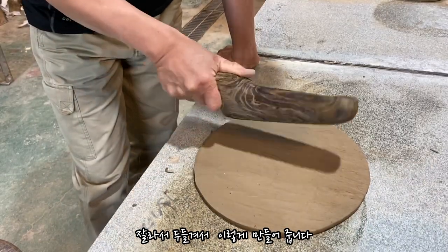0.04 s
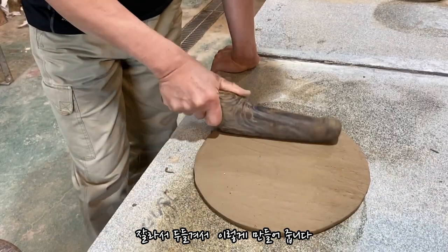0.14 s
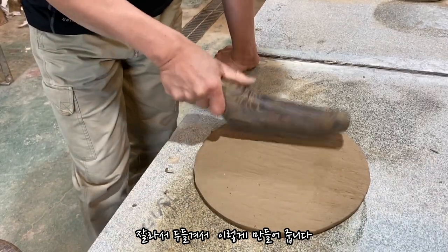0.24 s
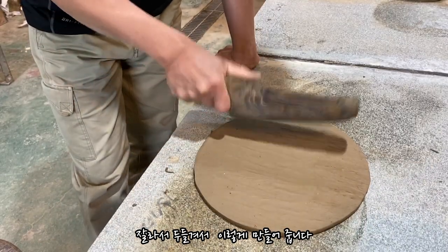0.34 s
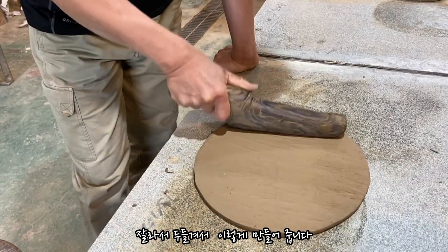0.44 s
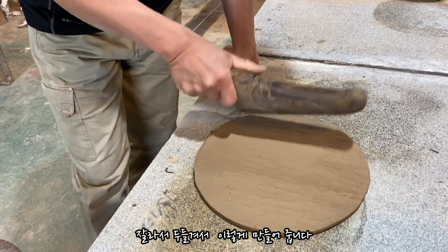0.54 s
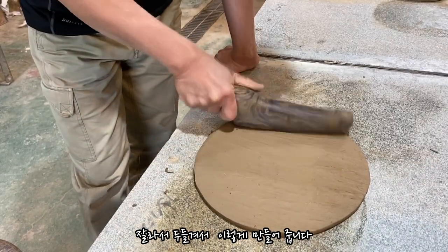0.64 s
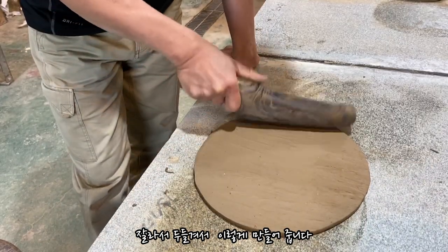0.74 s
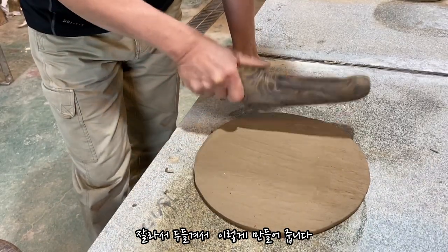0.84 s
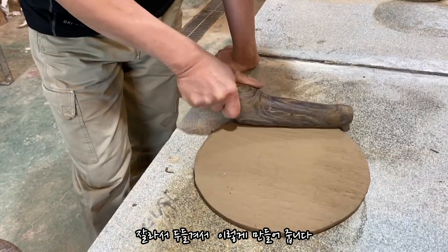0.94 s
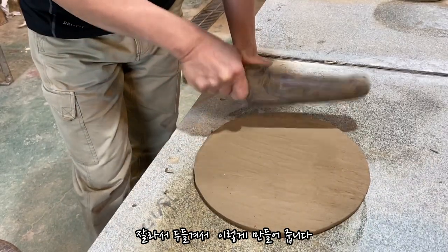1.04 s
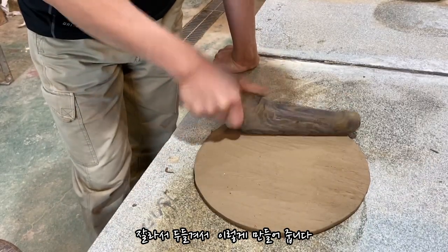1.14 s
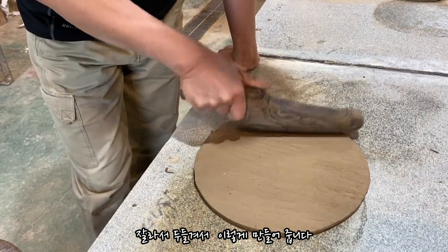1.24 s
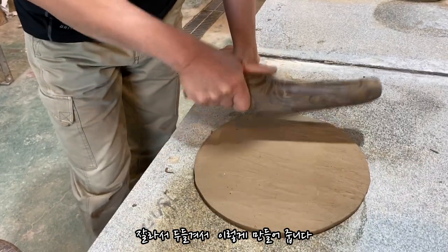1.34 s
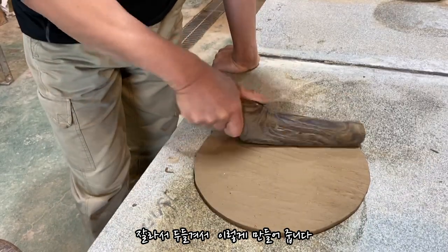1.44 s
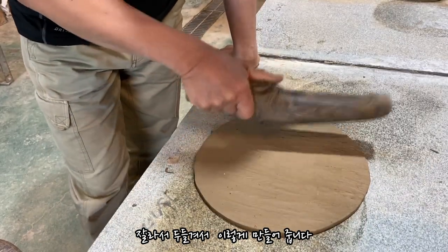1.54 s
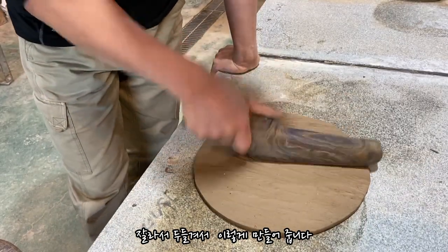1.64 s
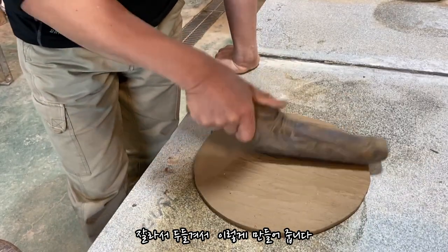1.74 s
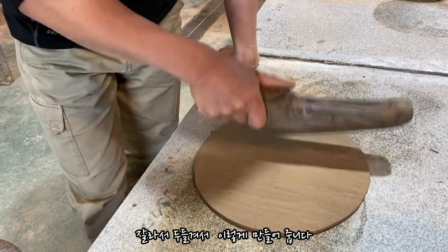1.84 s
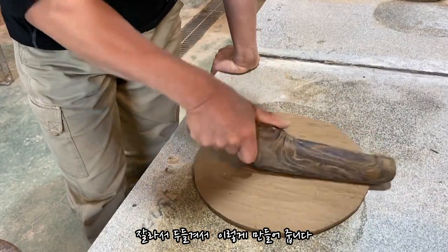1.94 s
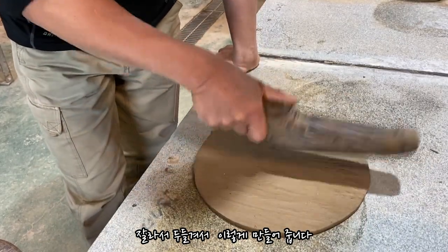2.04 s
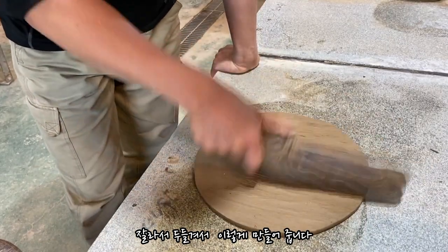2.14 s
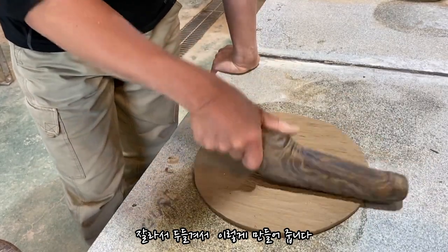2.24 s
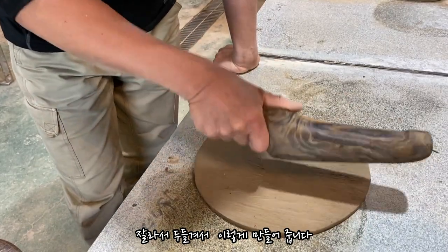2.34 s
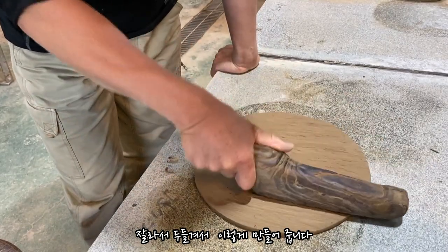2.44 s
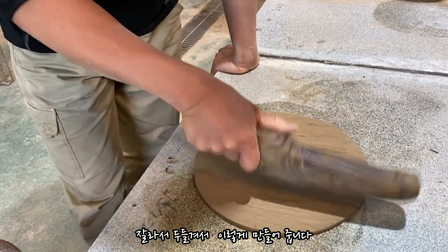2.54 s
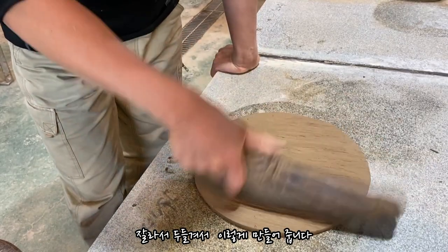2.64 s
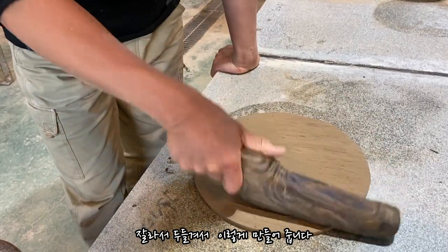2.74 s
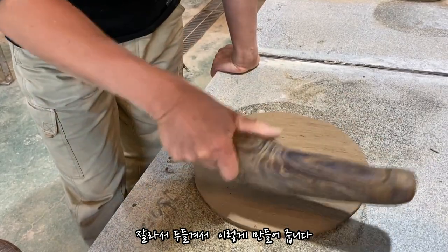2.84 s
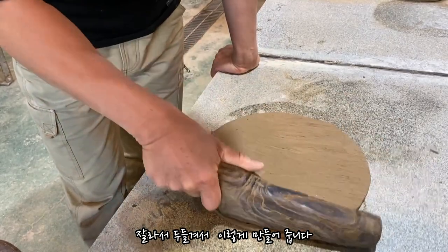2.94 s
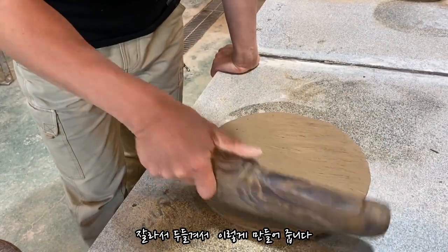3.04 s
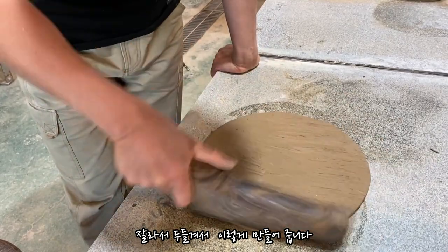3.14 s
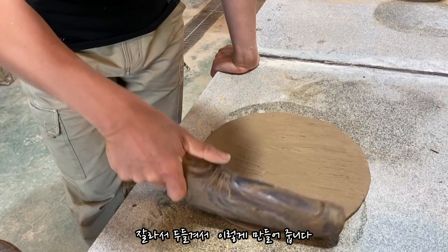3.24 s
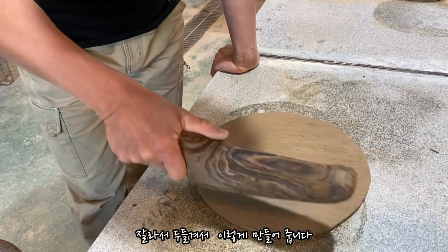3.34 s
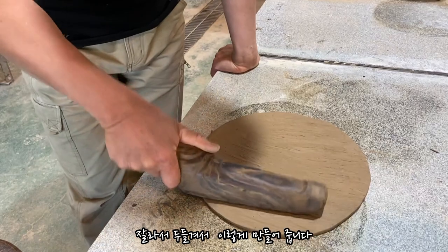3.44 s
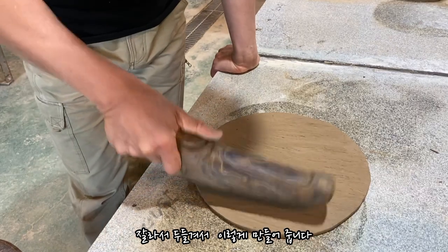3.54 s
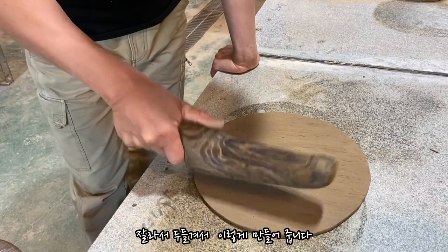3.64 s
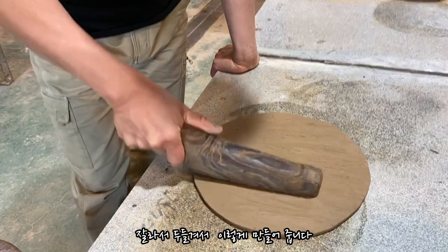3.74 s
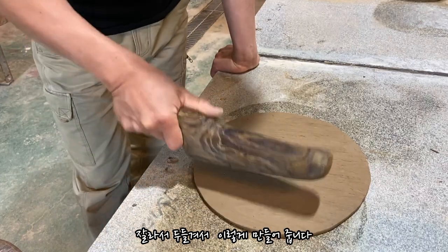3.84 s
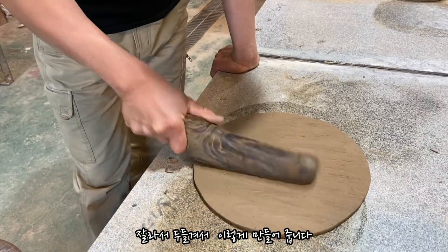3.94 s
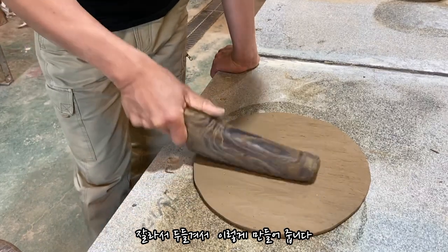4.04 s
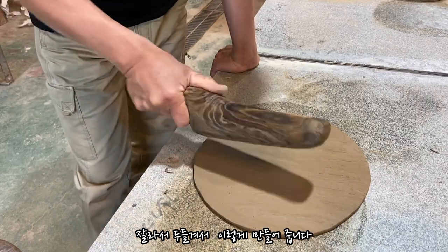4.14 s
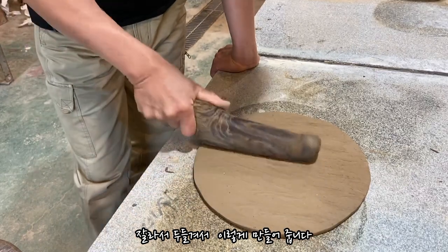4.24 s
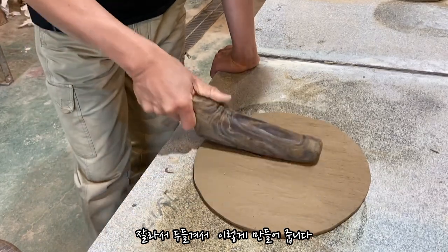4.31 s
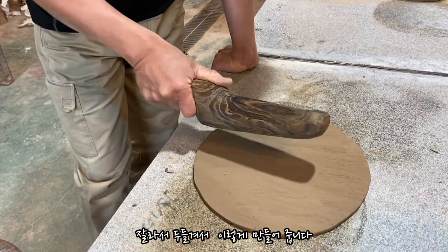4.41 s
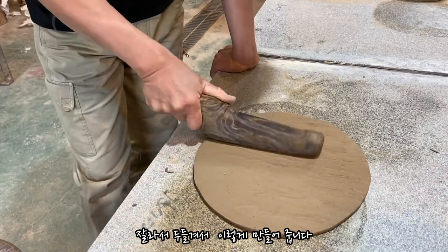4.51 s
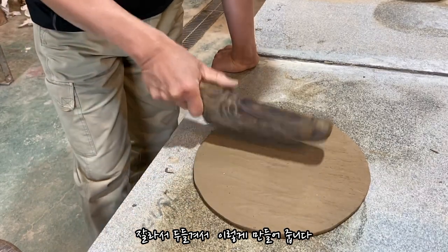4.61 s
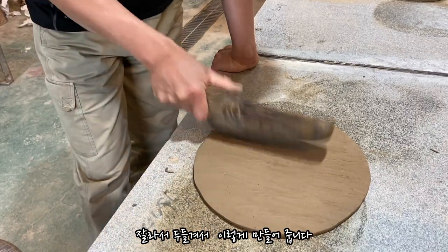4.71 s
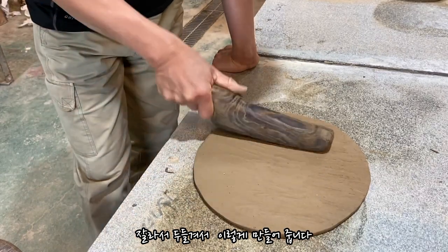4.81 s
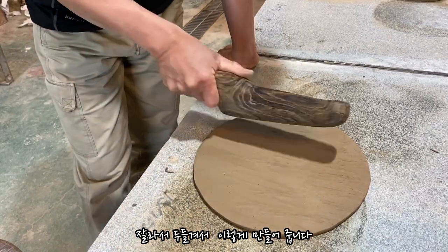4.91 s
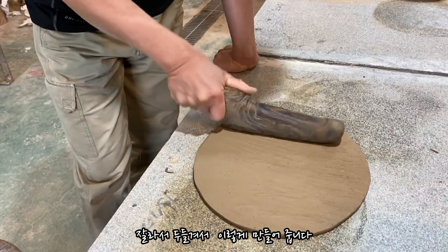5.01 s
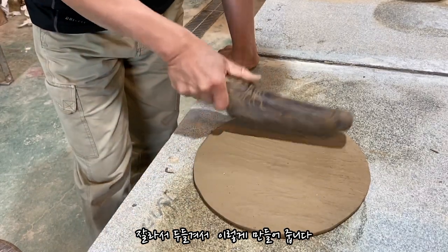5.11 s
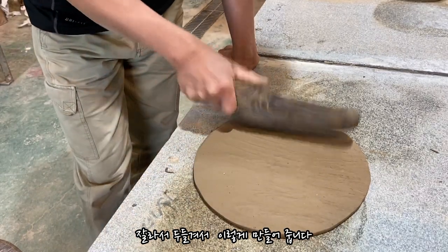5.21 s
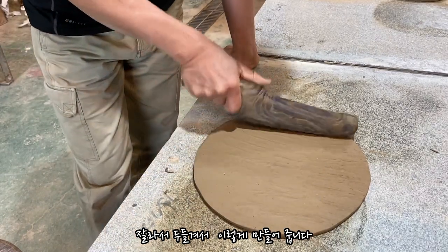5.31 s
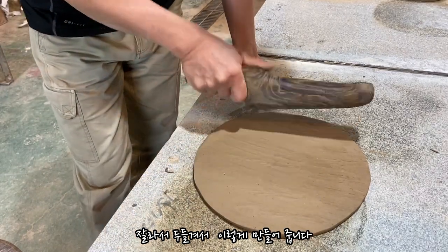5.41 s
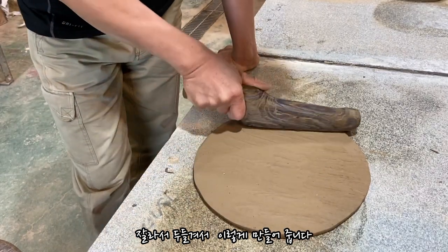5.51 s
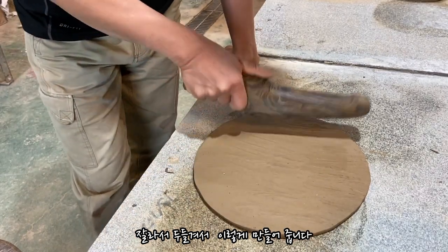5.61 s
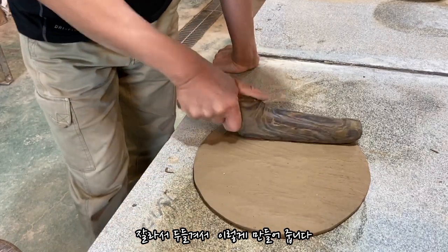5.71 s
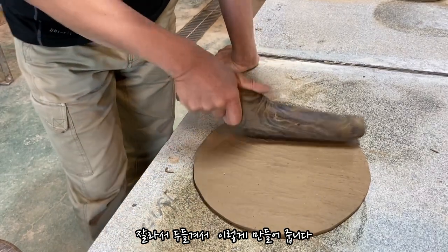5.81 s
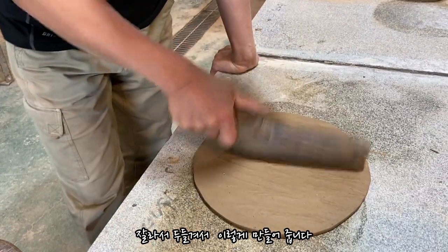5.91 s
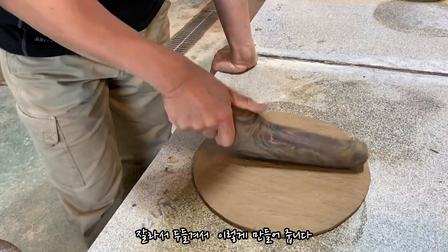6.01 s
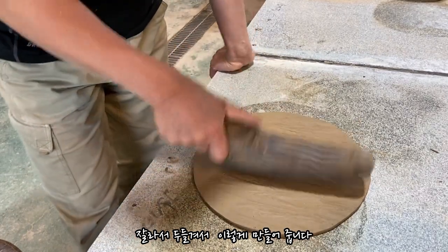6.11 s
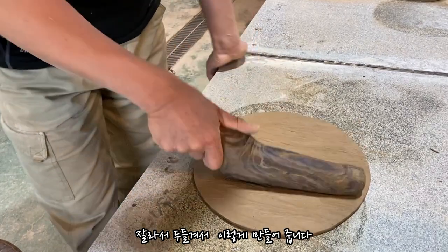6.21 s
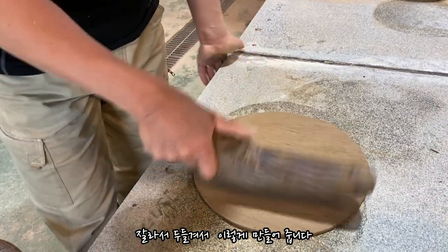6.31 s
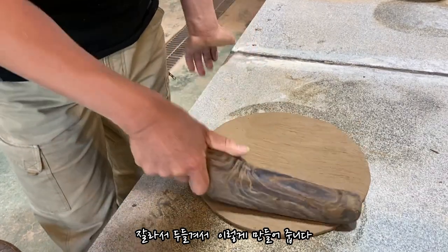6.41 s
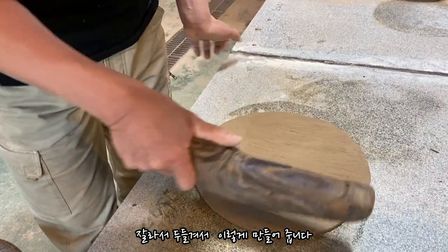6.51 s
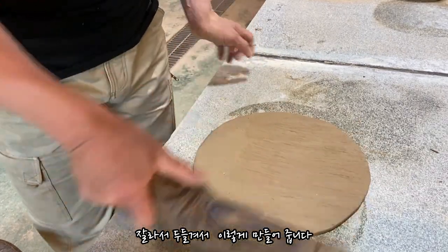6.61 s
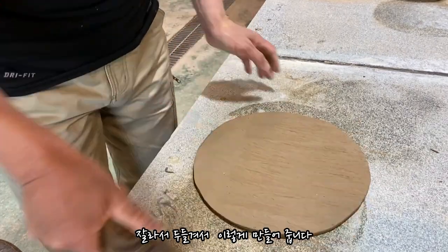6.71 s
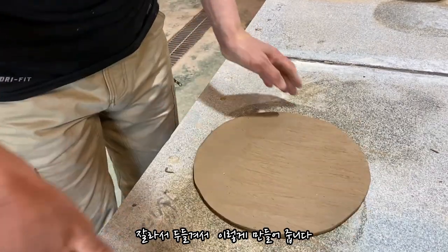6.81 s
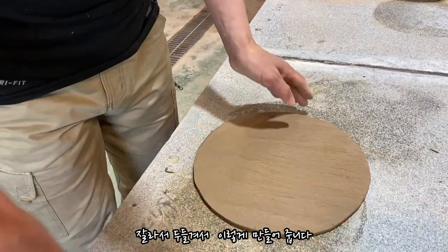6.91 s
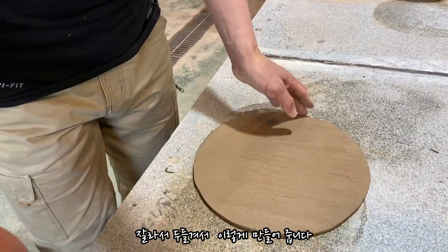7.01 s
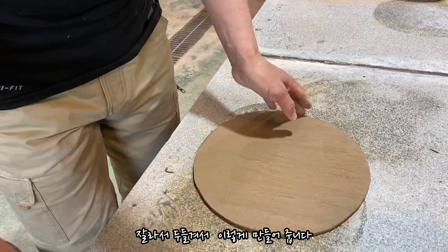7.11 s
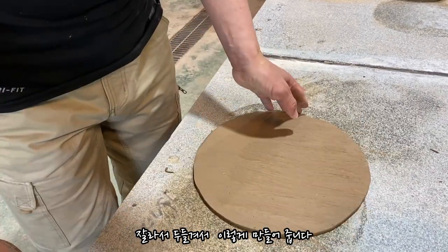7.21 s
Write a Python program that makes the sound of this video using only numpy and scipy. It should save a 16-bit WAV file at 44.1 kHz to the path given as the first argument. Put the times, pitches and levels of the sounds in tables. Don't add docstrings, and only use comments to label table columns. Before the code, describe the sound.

In a hard-walled pottery workshop, flat wood smacks moist clay in an even, quick rhythm for over six seconds. The slaps are bright and punchy, slightly different each time, with boomy table and room resonance underneath. After the final weaker hits the room decays to near silence, with faint wood-on-stone bumps, cloth rustle and tiny gritty ticks. Close microphone, loud peaks gently limited.

```python
import sys
import numpy as np
from scipy import signal
from scipy.io import wavfile
from scipy.ndimage import uniform_filter1d

SR = 44100
rng = np.random.default_rng(int(sys.argv[2]) if len(sys.argv) > 2 else 0)


def volts_from_db(level):
    exponent = np.asarray(level, float) / 20
    return 10 ** exponent


def persist_wave(psi):
    counts = np.round(np.clip(psi, -1, 1) * 32767).astype(np.int16)
    wavfile.write(sys.argv[1], SR, np.atleast_2d(counts).T)


N = 319901
LEAD_S = 1
LEAD_IN = 256
CONTACT_LEN = SR // 8


def read(points, hz):
    f, value = np.transpose(points)
    return np.interp(np.log(hz + 1), np.log(f + 1), value)


def colour(x, points):
    hz = abs(np.fft.fftfreq(4096, 1 / SR))
    log_gain = np.log(volts_from_db(read(points, hz)))
    phase = -signal.hilbert(log_gain).imag
    taps = np.fft.ifft(np.exp(log_gain + 1j * phase)).real[:2048]
    taps = taps.reshape((1,) * (x.ndim - 1) + (-1,))
    return signal.oaconvolve(x, taps, axes=-1)[..., :x.shape[-1]]


# (frequency [Hz], side against mid [dB])
WIDTH = [(60, -10.5), (130, -5.5), (290, -8), (640, 0), (1410, -1.5), (3100, -2), (6820, -4.5), (15000, -7)]


def spread(mid, other):
    side = colour(other, WIDTH)
    return np.array([mid + side, mid - side])


# (time [s], slap [dB], boom, thud, ring [dB against the slap])
EARLIER_BLOW = (-0.41, 14.5, -33, -38.5, -7)
# (time [s], slap [dB], weight of the arm [dB], paddle ring [dB])
BLOWS = [(0.075, -2, -30, -9.5), (0.3339, -1, -27.5, -6), (0.6011, -3.5, -28.5, -7),
         (0.8526, -3.5, -26.5, -11.5), (1.1035, -3, -27.5, -11.5), (1.354, -2.5, -28, -15),
         (1.6042, -3.5, -29.5, -10.5), (1.8578, -5, -28.5, -14), (2.1137, -1, -27, -12),
         (2.3688, -2, -25, -12.5), (2.616, -2, -25, -11.5), (2.8621, -1.5, -26, -13), (3.1134, -6, -27, -8),
         (3.3756, -2, -27.5, -17), (3.6428, -1.5, -22.5, -13), (3.909, -1, -27, -15),
         (4.1777, 0, -25, -12.5), (4.439, -2, -27, -8), (4.6941, -3, -24.5, -7.5),
         (4.9464, -3, -29.5, -17.5), (5.1942, -2, -26, -11.5), (5.435, -3, -28, -18),
         (5.67, -2.5, -26, -16), (5.889, -6.5, -30.5, -11.5), (6.103, -8.5, -34.5, -20.5),
         (6.313, -9.5, -32, -20)]
# (hollow clap [dB], clap pitch [Hz], band where it hisses out [Hz])
CLAPS = [(-14, 1510, 3470), (-10, 2800, 2900), (-5, 1400, 1250), (-17, 2500, 5800), (-12.5, 1570, 1000),
         (-3, 1600, 1600), (-13.5, 1700, 1100), (-17.5, 2150, 6350), (-8.5, 2140, 3700), (-15, 2170, 8200),
         (-12, 1400, 1100), (-6, 2600, 3420), (-5, 1700, 1150), (-10, 660, 7600), (-5, 1220, 9000),
         (-17, 1320, 4800), (-9.5, 3100, 6700), (-9, 990, 4600), (-14.5, 990, 2130), (-10, 1830, 4800),
         (-10, 1800, 5900), (-11, 7700, 4100), (-8.5, 1800, 2100), (-9, 1200, 1560), (-14.5, 1900, 5550),
         (-9, 1700, 1560)]
# (time [s], nearness to the free table edge [0-1], centre of the ring [Hz])
PATH = [(0, 0.5, 806), (1.35, 0.2, 785), (1.65, .9, 787), (3.4, 0.66, 754), (3.9, 0.28, 670),
        (4.6, 0.76, 775), (5.4, 0, 720), (5.9, 0.99, 763), (6.3, 1, 613)]
# (time [s], slap [dB], boom, thud, ring [dB against the slap])
SET_DOWN = [
    (6.84, -65.5, 0, -12, 1.6),
    (6.896, -59.5, 12, 18, 8.5),
    (6.953, -77, 26, 16, 2),
    (7.0, -76.5, 24.5, 5, 5),
    (7.086, -81.5, 32, 32, 10),
    (7.133, -83, 21, 12, 6),
    (7.169, -81, 27, 5, 16),
    (7.242, -70, 1.5, -7, 11),
]
# (unused, pocket [Hz], lift [dB], vent [Hz], lift [dB], ring centre [Hz])
PLAIN = (0, 2000, 0, 3000, 0, 760)
THUD_DB, EDGE_THUD_DB = 3, 8.5
FIZZ_DB, FIZZ_PER_OCTAVE_DB = -19, 0.5
CUSHION = 0.16
USUAL_CLAP_DB = -11
POCKET_DB, POCKET_GROWTH, VENT_DB = 1.63, 0.13, 3


def strikes():
    when_s, edge, ring_hz = np.transpose(PATH)
    rows = [(*EARLIER_BLOW, FIZZ_DB, PLAIN[1:])]
    for (s, db, weight_db, ring_db), (clap_db, clap_hz, vent_hz) in zip(BLOWS, CLAPS):
        air_db = clap_db - USUAL_CLAP_DB
        pocket_db = POCKET_DB + POCKET_GROWTH * air_db
        thud_db = weight_db + THUD_DB + EDGE_THUD_DB * np.interp(s, when_s, edge)
        fizz_db = FIZZ_DB - CUSHION * air_db + FIZZ_PER_OCTAVE_DB * np.log2(vent_hz / 3500)
        spot = (clap_hz, pocket_db, vent_hz, VENT_DB, np.interp(s, when_s, ring_hz))
        rows.append((s, db, weight_db - db, thud_db - db, ring_db - db, fizz_db, spot))
    dull = (2000, 0, 1600, -4, 522)
    for k, row in enumerate(SET_DOWN):
        rows.append((*row, -14, dull if k else PLAIN[1:]))
    return rows


def landing(pocket_hz, pocket_db, vent_hz, vent_db, ring_hz):
    hz = np.geomspace(300, 12000, num=40)

    def hump(centre_hz):
        return np.exp(-.5 * (np.log2(hz / centre_hz) / 0.33) ** 2)

    slap_db = 1.5 * (pocket_db * hump(pocket_hz) + vent_db * hump(vent_hz))
    usual_hz = PLAIN[5]
    ring_db = 45 * np.log2(ring_hz / usual_hz) * np.log2(np.clip(hz, 450, 1250) / usual_hz)
    return np.transpose([hz, slap_db]), np.transpose([hz, ring_db])


def burst(t, start_s, rise_s, fall_s):
    u = np.maximum(t - start_s, 0)
    lead_in = volts_from_db(-22) * np.exp(-abs(t - start_s) / .0016)
    return (1 - np.exp(-u / rise_s)) * np.exp(-u / fall_s) + lead_in


# (frequency [Hz], level [dB])
SLAP = [(300, -45), (900, -0.5), (1600, -1.5), (2500, -3.5), (4000, -4.5), (5500, -11.5), (7000, -10.5),
        (9000, -22.5)]
# (frequency [Hz], level [dB])
FIZZ = [(5000, -45.5), (7000, -2.5), (8500, -2), (10500, 1), (12000, -1), (13300, -9), (15000, -13.5),
        (17000, -47.5)]
# (frequency [Hz], level [dB], t60 [s])
WOOD = [(510, -5.5, 0.027), (585.4, -8, 0.046), (633, -7, 0.049), (780, -6.5, 0.013), (765, -6, 0.095),
        (894.5, -12.5, 0.1), (984, -12, 0.077), (1015, -14.5, 0.07), (1440, -14, 0.044)]
# (frequency [Hz], level [dB])
KNOCK = [(120, -35.5), (190, -3), (480, -7.5), (590, 2.5), (655, -0.5), (700, 5.5), (730, -4.5), (770, 5.5),
         (840, -2.5), (900, -5), (1000, -3), (1070, -8), (1400, -11), (2500, -31)]


def contact(ring_db, fizz_db, crisp, woody):
    t = (np.arange(CONTACT_LEN) - LEAD_IN) / SR
    noise = rng.standard_normal((2, 2, len(t)))
    bounce_s, bounce = rng.uniform(0.00093, 0.0028), rng.uniform(0.48, 0.8)
    click = 1. * (np.arange(len(t)) == LEAD_IN)

    pop = np.roll(click, round(0.00062 * SR))
    pop = pop + bounce * np.roll(click, round((.0007 + bounce_s) * SR))
    crackle = burst(t, 0.00059, 0.00037, 0.0013) + bounce * burst(t, bounce_s, 0.000081, 0.00075)
    slap = colour(volts_from_db(-4.5) * noise[0] * crackle + volts_from_db([[7], [1]]) * pop, SLAP)
    slap -= .5 * signal.lfilter(*signal.iirpeak(1700, 1.5, SR), slap)
    hissing = burst(t, 0.00057, 0.00022, 0.00064) + 0.37 * bounce * burst(t, bounce_s, 0.0006, 0.0012)
    fizz = colour(noise[1] * hissing, FIZZ)

    hz, db, t60 = np.transpose(WOOD)[:, :, None]
    grip = rng.standard_normal((len(WOOD), 4))[:, :, None]
    fade = volts_from_db(db + read(woody, hz) + 2 * grip[:, 0] - 60 * t / t60)
    angle = 2 * np.pi * hz * (1 + 0.012 * grip[:, 1]) * t
    ring = np.array([(fade * np.sin(angle + 3 * grip[:, k])).sum(0) for k in (2, 3)])
    swell = 1 - np.exp(-(np.maximum(t, 0) / 0.0017) ** 2)
    near = colour(volts_from_db(7.5) * slap + volts_from_db(fizz_db + 21) * fizz, crisp) + volts_from_db(ring_db + 1.5) * ring * swell

    late, early = np.roll(click, round(bounce_s * SR)), np.roll(click, round(0.35 * bounce_s * SR))
    click = click + 0.15 * late - 0.15 * early
    far_slap = volts_from_db(13) * colour(colour(click, SLAP), crisp)
    far_ring = volts_from_db(ring_db + 33.0) * colour(colour(click, KNOCK), woody)
    far_fizz = volts_from_db(fizz_db + 20.5) * colour(colour(click, FIZZ), crisp)
    return near, np.array([far_slap, far_ring, far_fizz])


# (frequency [Hz], t60 [s])
WALLS = [(400, 0.54), (1000, 0.57), (2500, 0.57), (6000, 0.53), (12000, 0.38), (16000, .3)]
# (frequency [Hz], t60 [s])
EARLY_T60 = [(300, 0.16), (800, 0.15), (2000, 0.16), (8000, 0.22)]
# (frequency [Hz], level [dB])
WALL_TONE = [(150, -13.5), (300, 5.5), (600, -4), (1200, -3.5), (2500, -3.5), (5000, -1.5), (9000, -2.5),
             (12000, -6), (16000, -9)]


def walls(count):
    taps = np.zeros((count, 2, SR))
    at = np.arange(200, SR - 20, 10) + rng.integers(0, 10, (count, 2, (SR - 211) // 10))
    np.put_along_axis(taps, at, rng.choice([-1., 1.], at.shape), 2)
    hz, t, z = signal.stft(taps, SR, nperseg=128)
    t60 = read(WALLS, hz)[:, None]
    early_t60 = read(EARLY_T60, hz)[:, None]
    fade = volts_from_db(-60 * t / t60) + volts_from_db(6.5 - 60 * t / early_t60) + volts_from_db(-19 - 60 * t / (2.7 * t60))
    clumps = uniform_filter1d(rng.standard_normal(z[:, :1].shape), size=2, axis=2)
    clumps = uniform_filter1d(clumps, size=12, axis=3)
    fade = fade * volts_from_db(2.5 * clumps / clumps.std())
    tail = signal.istft(z * fade, SR, nperseg=128)[1][..., :SR]
    tail = colour(tail, WALL_TONE)
    return tail / np.linalg.norm(tail[0, 0])


def standing(modes, meet_s, turn_rad, rise_s, apart_rad):
    hz, db, t60, sign = np.transpose(modes)[:, :, None]
    t = np.arange(SR * 5 // 4) / SR
    skew = apart_rad * rng.standard_normal(hz.shape) * hz / 300
    fade = np.sign(sign) * volts_from_db(db - 60 * t / t60) * (1 - np.exp(-(t / rise_s) ** 2))
    angle = 2 * np.pi * hz * (t - meet_s) + turn_rad
    waves = np.array([fade * np.cos(angle + side * skew) for side in (-1, 1)])
    return waves.sum(1), waves[:, ::2].sum(1) - waves[:, 1::2].sum(1)


def shake(pushes, waves, share):
    out = np.zeros((2, len(pushes) + 2 * SR))
    at = np.flatnonzero(pushes)
    for k, lean in zip(at, share * rng.uniform(-1.7, 1.7, len(at))):
        out[:, k:k + waves[0].shape[1]] += pushes[k] * (waves[0] + lean * waves[1])
    return out[:, :len(pushes)]


# (frequency [Hz], level [dB], t60 [s], sign at the microphone)
BOOM = [(33, -25.5, 0.65, 1), (42, -16.5, 0.9, 1), (59, -15, 2.3, 1), (68.5, -1.5, 0.42, 1),
        (82.7, -1.5, 0.82, 1), (90.56, -5.5, 0.77, 1), (97.2, 1.5, 0.81, -1), (114, -10.5, 0.51, 1),
        (107.7, 8.5, 0.5, 1), (131.03, -2.5, 1.2, 1), (141.3, 0.5, 0.38, -1), (152, -1, 0.62, 1)]
# (frequency [Hz], level [dB], t60 [s], sign)
THUD = [(180, -4.5, 0.69, 1), (214.7, -5, 0.42, 1), (233, -6.5, 1, 1), (266.6, -7.5, 0.83, 1),
        (263.4, 4, 0.3, 1), (289, -15, 0.12, 1), (291.8, 2, .45, 1), (314.6, 6, 0.27, -1),
        (344.5, -11, 0.6, 1), (387, 18.5, 0.053, 1), (317, 6, 0.17, 1), (377, -22.5, 0.12, 1),
        (397, -18, 0.84, -1), (456, -1.5, 0.28, 1)]


def paddle():
    size = N + SR * 9 // 8
    direct, pushes, sends = np.zeros((2, size)), np.zeros((2, size)), np.zeros((4, size))
    for s, db, boom_db, thud_db, ring_db, fizz_db, spot in strikes():
        at = round((s + LEAD_S) * SR)
        span = slice(at - LEAD_IN, at - LEAD_IN + CONTACT_LEN)
        near, far = contact(ring_db, fizz_db, *landing(*spot))
        paths = np.linalg.qr(rng.standard_normal((4, 3)))[0]
        direct[:, span] += volts_from_db(db) * near
        sends[:, span] += volts_from_db(db) * paths @ far
        pushes[:, at] = volts_from_db(db + np.array([boom_db, thud_db]))
    wet = signal.oaconvolve(sends[:, None], walls(count=4), axes=2).sum(0)[:, :size]
    room = standing(BOOM, meet_s=.0205, turn_rad=2.15, rise_s=0.004, apart_rad=0.17)
    table = standing(THUD, meet_s=.005, turn_rad=3.03, rise_s=0.003, apart_rad=.58)
    boom = shake(pushes[0], room, share=0.13)
    thud = shake(pushes[1], table, share=0.33)
    mix = spread(*(direct + wet)) * volts_from_db([[-.3], [.3]])
    mix += volts_from_db([[-4.4], [-1.6]]) * boom + volts_from_db([[-11], [-9.5]]) * thud
    return mix[:, LEAD_S * SR:LEAD_S * SR + N]


def fade_out(x):
    power = abs(uniform_filter1d((x ** 2).mean(0), size=1500))
    level_db = 10 * np.log10(power + 1e-12)
    return x * volts_from_db(np.clip(0.34 * (level_db + 37.0), -15, 0))


# (time [s], level [dB], pitch [Hz])
TICKS = [
    (6.838, -52, 1250),
    (6.896, -45, 1328),
    (7.243, -61, 996),
]
CLAP_LAG_S = 0.00028


def claps():
    out, t = np.zeros(N + SR), np.arange(800) / SR
    pockets = [(blow[0] + CLAP_LAG_S, *clap[:2]) for blow, clap in zip(BLOWS, CLAPS)]
    for s, db, hz in pockets + TICKS:
        at = round(s * SR)
        fade = volts_from_db(db - 60 * t / 0.012) * (1 - np.exp(-t / 0.00011))
        out[at:at + len(t)] += fade * np.sin(2 * np.pi * hz * t)
    out += volts_from_db(-6) * np.roll(out, round(.0019 * SR))
    side = volts_from_db(-11.0) * np.roll(out, round(.0003 * SR))
    return spread(out[:N], side[:N])


def hiss(tone, level):
    noise = colour(rng.standard_normal((2, N)), tone)
    level_db = np.interp(np.arange(N) / SR, *np.transpose(level))
    return noise / noise.std() * volts_from_db(level_db)


# (frequency [Hz], level [dB])
AIR = [(30, 1.5), (70, 12), (160, -8), (400, -15), (1100, -10.5), (1500, -4), (2020, -13.5), (2120, 6.5),
       (2330, -13.5), (2700, -11), (4000, -17), (9000, -17), (13000, -40), (16000, -43.5)]
# (time [s], level [dB])
AIR_LEVEL = [(6.398, -68.5), (6.6, -60.5), (6.75, -68.5), (6.85, -85), (7.05, -79), (7.25, -91.5)]
# (frequency [Hz], level [dB])
CLOTH = [(300, -12.5), (900, -0.5), (1500, -9.5), (3000, 0), (5000, -1), (8000, -7), (12000, -2),
         (15000, -3), (16500, -34.5)]
# (time [s], level [dB])
CLOTH_LEVEL = [(6.801, -82), (6.89, -87), (6.9, -71), (6.981, -68.5), (7.06, -75), (7.13, -81), (7.17, -85),
               (7.25, -71)]
# (time [s], level [dB])
GRIT = [
    (7.02, -59.5),
    (7.055, -67),
    (7.063, -57),
    (7.078, -68),
    (7.21, -72),
]


def air():
    sound = hiss(AIR, AIR_LEVEL) + hiss(CLOTH, CLOTH_LEVEL)
    t = np.arange(400) / SR
    for s, db in GRIT:
        at = round(s * SR)
        grain = rng.standard_normal(len(t)) * burst(t, 0, 0.00056, 0.002)
        sound[0, at:at + len(t)] += volts_from_db(db + 14.0) * colour(grain, FIZZ)
    return spread(*sound)


def scene():
    return fade_out(paddle()) + claps() + air()


# (low edge [Hz], high edge [Hz], share of the time [0-1])
STARVED = [(6300, 6800, .06), (8000, 8400, .12), (8400, 8900, .25), (8900, 9700, .06), (9700, 10400, .5),
           (10400, 11300, .14), (11300, 12000, .45), (12000, 12700, .1), (12700, 13400, .45),
           (13400, 14300, .7), (14300, 15300, .8), (15300, 17000, .92)]


def starve(x):
    hz, t, z = signal.stft(x, SR, nperseg=512, noverlap=384)
    power = uniform_filter1d((abs(z) ** 2).mean(0), size=5, axis=1) + 1e-20
    whole_db = 10 * np.log10(power.sum(0))
    attack = whole_db > np.roll(whole_db, 6) + 8
    keep = np.ones(power.shape)
    for lo_hz, hi_hz, share in STARVED:
        band = (hz >= lo_hz) & (hz < hi_hz)
        whim = np.repeat(rng.standard_normal(len(t) // 16 + 1), 16)[:len(t)]
        band_db = 10 * np.log10(power[band].mean(0))
        slope = 1.5 if hi_hz < 13000 else 1.1
        margin_db = band_db - slope * whole_db + 3 * whim - 99
        margin_db[attack] = 0
        keep[band] = margin_db >= np.quantile(margin_db, np.clip(share, 0, 1))
    return signal.istft(z * keep, SR, nperseg=512, noverlap=384)[1][:, :N]


def roll_off(x):
    return signal.sosfilt(signal.butter(12, 16790, fs=SR, output="sos"), x)


def record(dry):
    limited = 1.023 * np.tanh(dry / 1.147)
    lowpass = signal.firwin(511, 16750, window=("kaiser", 10), fs=SR)[None]
    mix = signal.oaconvolve(starve(limited), lowpass, "same")
    return roll_off(mix)


dry = scene()
out = record(dry)
persist_wave(out)
```